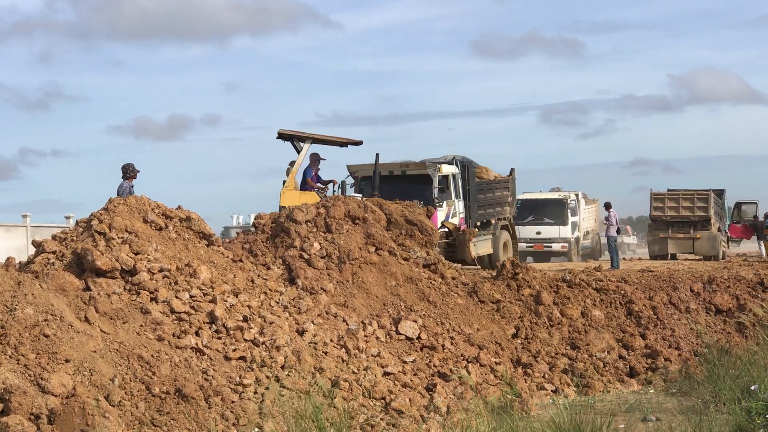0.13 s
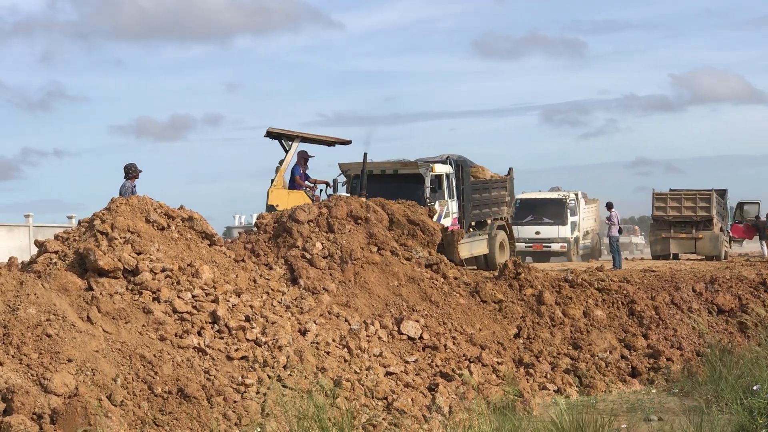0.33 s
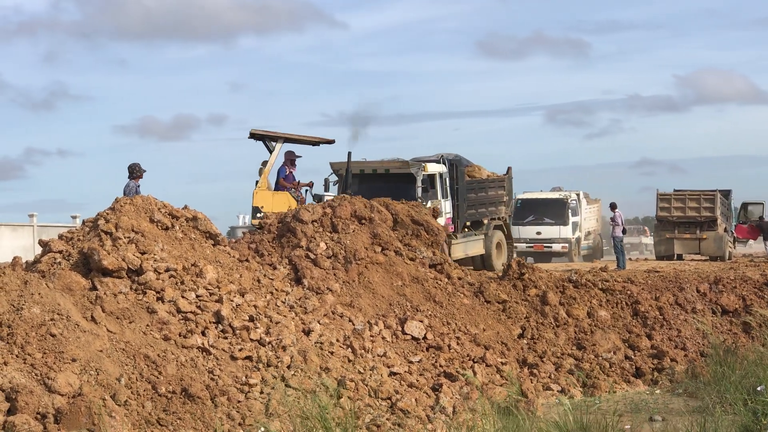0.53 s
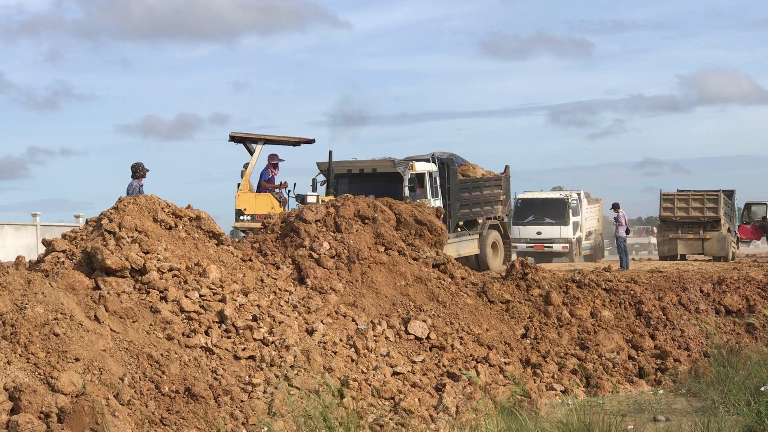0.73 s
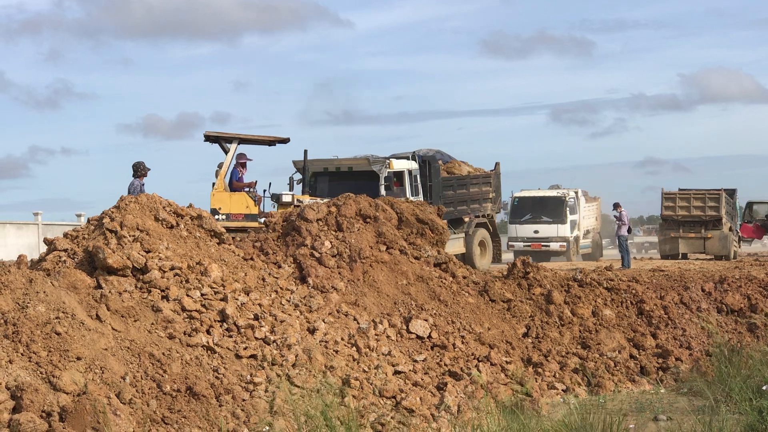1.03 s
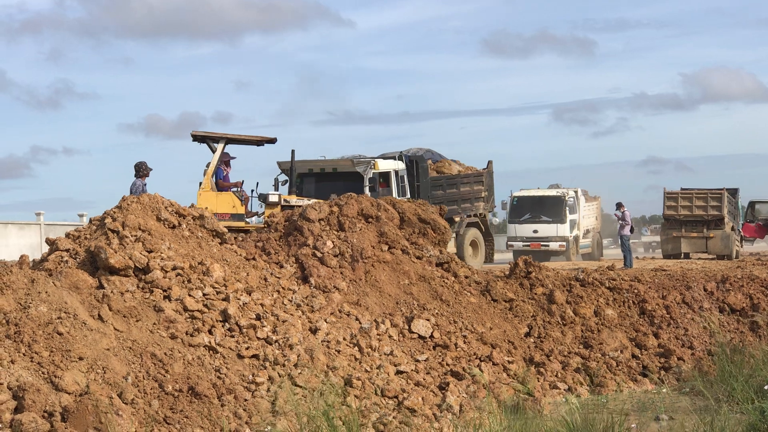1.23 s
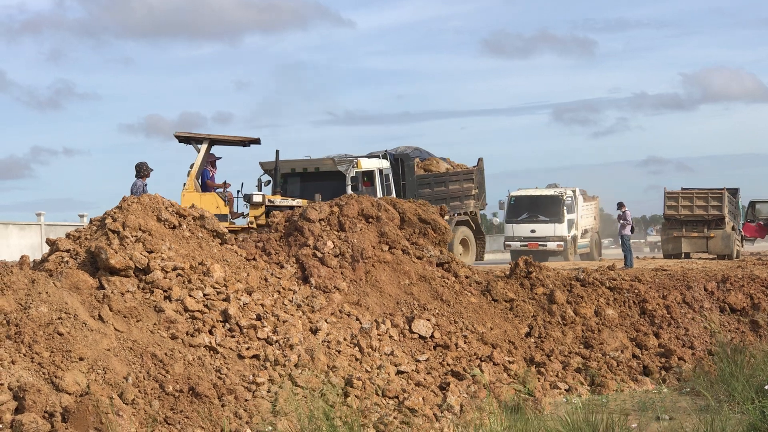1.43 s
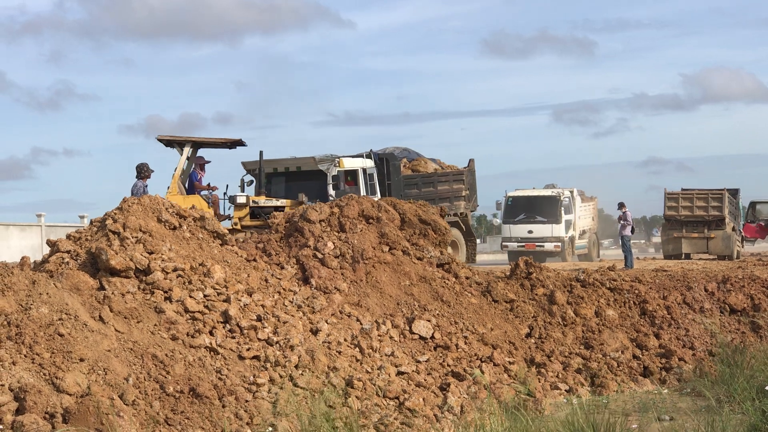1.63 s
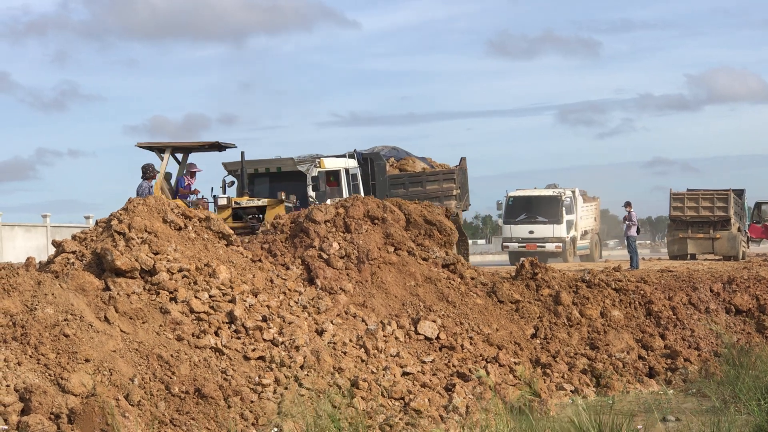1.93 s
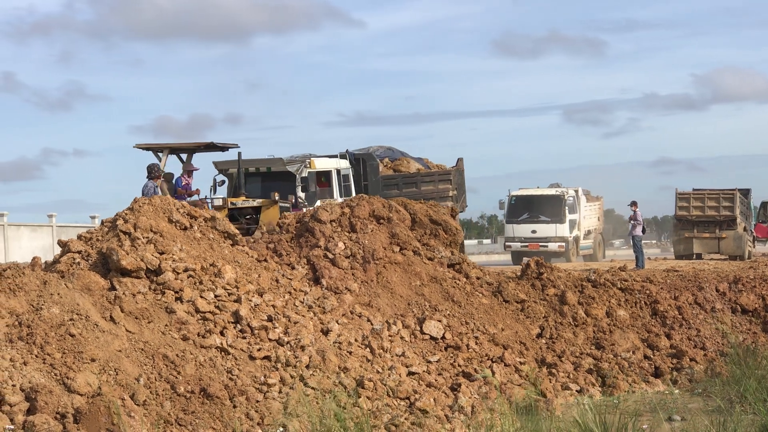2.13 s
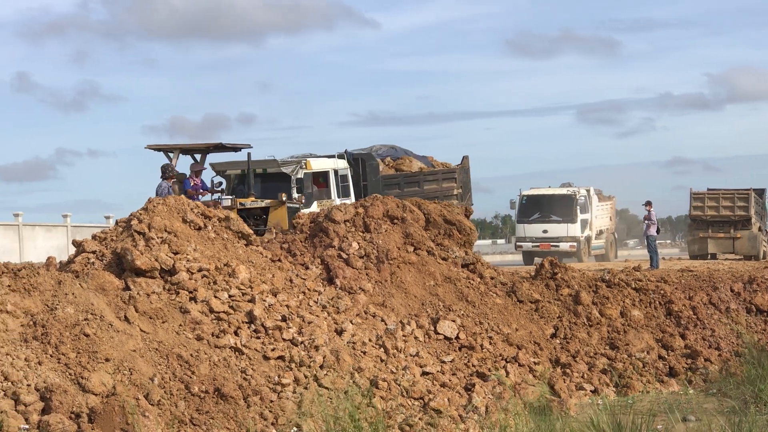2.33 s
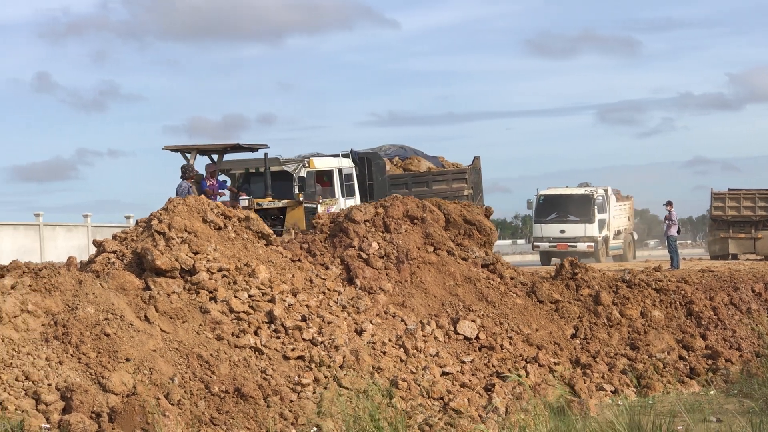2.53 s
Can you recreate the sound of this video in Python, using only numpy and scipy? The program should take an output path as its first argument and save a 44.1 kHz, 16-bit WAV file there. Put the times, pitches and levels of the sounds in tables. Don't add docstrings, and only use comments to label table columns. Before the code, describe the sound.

A bulldozer's low, uneven diesel drone runs throughout, with clattering hiss and steel tracks clanking, ringing and squeaking; a truck revs and fades early on, over outdoor site rumble, heard from afar in mono.

```python
import sys
import numpy as np
from scipy import signal
from scipy.io import wavfile
from scipy.ndimage import uniform_filter1d

SR = 44100
rng = np.random.default_rng(int(sys.argv[2]) if len(sys.argv) > 2 else 0)


def amplitude_ratio(level_db):
    exponent = np.asarray(level_db, float) / 20
    return 10 ** exponent


def inscribe(sig):
    pcm = np.round(np.clip(np.atleast_2d(sig).T, -1, 1) * 32767)
    wavfile.write(sys.argv[1], SR, pcm.astype(np.int16))


N = 118629
T = np.arange(N) / SR

# frequency [Hz], density [dB per Hz].
RUMBLE_SHAPE = [(22, -12), (33, -3), (45, 0), (85, 1), (110, 0), (160, -4), (210, -12), (300, -22)]
# centre in seconds, level in dB, pitch in Hz, length in seconds.
SHUDDERS = [
    (0.18, -48, 51, .45),
    (1.654, -38, 45, 0.25),
    (1.28, -44, 130, 0.12),
    (1.9, -41, 120, .14),
]
# time in seconds, pipe note in Hz, level in dB.
TRUCK_NOTE = [(0, 95, -33), (.25, 104, -35), (.43, 114, -42), (.58, 108, -47), (.74, 112, -40),
              (.95, 120, -45), (1.18, 117, -44), (1.45, 114, -49), (1.7, 112, -60)]
# multiple of the pipe note, level in dB relative to it.
TRUCK_ORDERS = [(.5, -7), (1, 0), (1.5, -12)]
# resonance in Hz, width in Hz, level in dB.
PANELS = [(387, 45, -63.5), (602, 120, -65), (973, 21, -63.5), (1266, 130, -62.5), (1422, 64, -60),
          (1638, 120, -72), (2064, 250, -62), (3000, 220, -66.5), (3394, 220, -68), (6240, 440, -73)]
# time in seconds, engine effort in dB, scraping of the tracks in dB.
EFFORT = [(0, 1, -0.5), (.3, 0.5, -2.5), (.65, 0.5, 2), (.8, 1, -1.5), (1.2, 1, 0), (1.55, 0.5, -1.5),
          (1.95, 0, 2), (2.3, 0, 1.5), (2.69, -0.5, 2.5)]
# time in seconds, peak in dB, mid band in dB, top band in dB.
CLANKS = [(0.105, -43, 9, -7), (0.393, -34.5, 9, -8), (0.4043, -42, -1, -15), (0.413, -53, 13, -16),
          (0.4894, -53, 2, -16), (0.5571, -40, 4.5, -0.5), (0.5995, -39.5, 6, -11), (0.7004, -38, 5, -12),
          (0.8525, -43, 8, 0), (0.9454, -37.5, -1, 0), (0.9922, -51, 22, 1), (1.038, -38, 3, -1),
          (1.08, -43, 3, -10), (1.1369, -40.5, 1, -5), (1.1764, -44, -2, -3), (1.2237, -39, 10, 5.5),
          (1.2631, -39.5, -8, -8), (1.3042, -44, -1, -15), (1.3326, -46.5, 0, 4.5), (1.344, -48, 6, -1),
          (1.4337, -47.5, -11, 2), (1.6924, -44, 9, -4), (1.7582, -45, 6, -23), (1.8545, -51, 8, -10),
          (1.9009, -44, 2, -14), (1.9494, -43, 7, -10), (2.0103, -51, 1, -18), (2.1198, -46, -2, -7),
          (2.5324, -37.5, 6, -3), (2.541, -51, -1, -5)]
# start in seconds, peak in dB, pitch in Hz, 60 dB decay in seconds.
RINGS = [(0.5606, -34.5, 2130, 0.055), (0.6045, -35, 2164, 0.16), (0.8492, -40, 2070, 0.23),
         (0.9434, -30.5, 2007, 0.048), (1.1744, -41, 2050, 0.11), (1.2745, -36, 2057, 0.049),
         (1.304, -38.5, 2610, 0.24), (1.5749, -36, 2586, 0.15), (1.6501, -41.5, 2600, 0.2),
         (1.7543, -37, 2600, 0.063), (0.411, -37, 1700, 0.055), (0.4943, -39, 2130, 0.083),
         (0.5267, -38, 1920, 0.08), (0.626, -39, 2102, 0.06), (0.684, -36, 1920, 0.1),
         (1.0331, -44, 2070, 0.03), (1.1433, -43, 2030, 0.091), (1.798, -40, 3010, 0.07),
         (1.8532, -35.5, 2992, 0.066), (1.875, -41, 3300, 0.12), (1.915, -39, 3020, 0.081),
         (1.978, -41, 3140, 0.11), (1.995, -39, 3280, 0.06), (2.0293, -39, 3070, 0.099),
         (2.0582, -39, 2970, 0.093), (2.079, -44, 3020, 0.074), (2.25, -44, 4103, 0.061),
         (2.31, -45, 3610, 0.067), (2.4268, -50, 2955, 0.07), (2.541, -44, 4150, 0.058)]
# centre in seconds, level in dB, pitch in Hz,
# length in seconds.
SQUEAKS = [(.404, -53, 6050, .014), (.405, -52, 7000, .014), (.564, -52, 7700, .016),
           (.467, -51, 3250, .02), (.6, -52, 3350, .02), (.64, -50, 3300, .022), (.672, -51, 3300, .02),
           (.949, -49, 11200, .012), (.952, -54, 14900, .014), (1.04, -53, 14700, .012),
           (1.04, -55, 10700, .01), (1.055, -58, 13200, .006), (1.085, -59, 11700, .016),
           (1.013, -58, 11500, .014), (1.022, -57, 14100, .016), (1.041, -48, 13200, .012),
           (1.043, -52, 7700, .012), (1.229, -50, 15100, .012), (1.45, -51, 1300, .03),
           (1.49, -51, 1230, .03), (1.525, -52, 1300, .025), (1.545, -54, 3500, .025),
           (1.690, -51, 830, .05), (1.698, -56, 11000, .012), (1.862, -59, 11700, .016),
           (1.961, -64, 11700, .014), (2.388, -59, 11900, .028), (2.545, -47, 480, .045)]
# time in seconds, firing rate in Hz, exhaust note in dB, second harmonic in dB.
DOZER_NOTE = [(0, 64.4, -31, -31.5), (.2, 63.47, -33, -40), (.32, 62.02, -35, -41.5),
              (.4, 61.66, -21.5, -40.5), (.55, 61.9, -27, -45.5), (.68, 62.64, -26, -38),
              (.88, 66, -32, -43), (1.05, 67.75, -35.5, -34), (1.18, 63.7, -37.5, -44.5),
              (1.3, 61.7, -32, -38.5), (1.45, 63.32, -32, -38), (1.63, 65.35, -29, -35),
              (1.8, 63.1, -33.5, -33), (1.9, 61.27, -32.5, -43.5), (2.1, 66.8, -30.5, -33.5),
              (2.2, 68.67, -37, -34.5), (2.5, 67.9, -32, -40), (2.69, 68.1, -37, -37)]
# multiple of the firing rate, level in dB.
UNEVEN_ORDERS = [(1.25, -50), (1.5, -50), (2.25, -60), (2.5, -53), (4, -64)]
# centre in seconds, change of exhaust note in dB,
# change of second harmonic in dB, length in seconds.
JOLTS = [(0.071, -5, -8, 0.039), (0.112, 4.5, -10, 0.057), (.16, -10, -4, 0.037), (.21, 3.5, 7, 0.055),
         (0.266, 6, 7, 0.031), (0.356, 0, -15, 0.035), (.43, -4.5, 8, 0.049), (.5, -0.5, -3, 0.053),
         (0.549, -6, 11, 0.024), (0.795, -2.5, -5, 0.04), (0.866, -4, -7, .04), (0.926, 3.5, 3, 0.061),
         (0.993, -4, 0, 0.044), (1.113, 7.5, 1, .06), (1.166, -12, 4, 0.048), (1.255, 5.5, 5.5, 0.047),
         (1.3, -6, 8, 0.042), (1.329, 8, -7, 0.041), (1.404, 3.5, -1, 0.057), (1.455, 6, -1, .04),
         (1.537, 0.5, 0.5, 0.056), (1.629, -1, 5, 0.039), (1.686, 0, -5, 0.034), (1.93, 0.5, 1, 0.047),
         (2.09, 2, -1.5, 0.057), (2.169, 1.5, -9, 0.053), (2.555, 0, -2, 0.068)]
# time in seconds, third harmonic in dB.
BARK = [(0, -49), (.3, -54), (.47, -42.5), (.7, -58), (.9, -54.5), (1.2, -51.5), (1.42, -44.5), (1.65, -52),
        (1.85, -69), (2.12, -59), (2.3, -59), (2.69, -64)]
# frequency [Hz], density [dB per Hz].
CLATTER_SHAPE = [(130, -6), (220, -29), (277, -2), (382, 1.5), (2110, -5), (3420, -9.5), (4800, -14.5),
                 (6160, -18.5), (15600, -28.5)]

RUMBLE_DB, RUMBLE_SWELL_DB = -44, 1.5
IDLE_HZ, IDLE_DB, IDLE_FLICKER_DB = 49.5, -45, 2.5
PITCH_JITTER = .003
BAND_FLICKER_DB = 0.87
SCRAPE_FROM_HZ, SCRAPE_FULL_HZ = 1800, 4500
BUZZ_DB, BUZZ_PER_S = 2.5, 45
RASP_GAIN = 2.1
ATTACK_S, HOLD_S, CLANK_T60_S, EARLY_S = .005, .002, .08, 0.0046
TAIL_DB, TAIL_T60_S = -11, 0.3
MODE_DB, MODE_SCATTER_DB, GRAIN_DB = -23.5, 2.5, 2.5
RING_DB, RING_ROUGH_DB, SQUEAK_ROUGH_DB = -8, 3.2, 3.5
WOBBLE = .006
UNEVEN_FLICKER_DB, BARK_WIDTH_HZ = 4, 45
CLATTER_DB, CLATTER_SWELL_DB = -45.5, .2
GATE_DEPTH, GATE_SHARE = .3, 0.27
RATTLE_DB, RATTLE_SWING_DB, RATTLE_PER_S = -6.5, 3, 40
NOTCH_HZ, NOTCH_WIDTH_HZ, NOTCH_DEPTH = 10380, 730, 0.36
TOP_HZ, BOTTOM_HZ = 15700, 24


def level(x, db):
    return x * amplitude_ratio(db) / np.sqrt(np.mean(x ** 2))


def curve(table, k):
    points = np.array(table)
    return np.interp(T, points[:, 0], points[:, k])


def band(x, lo_hz, hi_hz):
    edges = [lo_hz, min(hi_hz, .45 * SR)]
    return signal.sosfilt(signal.butter(2, edges, "bandpass", fs=SR, output="sos"), x)


def noise():
    return rng.standard_normal(N)


def walk(rate):
    k = int(SR / rate)
    held = np.repeat(rng.standard_normal(N // 100), k)[:N + k]
    return 1.3 * uniform_filter1d(uniform_filter1d(held, k), k)[:N]


def bump(s, length):
    return np.exp(-((T - s) / length * 2) ** 2)


def blow(start, attack_s, hold_s, t60):
    u = np.maximum(T - start, 0)
    fall = amplitude_ratio(-60 * np.maximum(u - attack_s - hold_s, 0) / t60)
    return np.minimum(u / attack_s, 1) * fall


def coloured(shape, source, swell, treble=0):
    hz, db = np.array(shape).T
    edges = np.geomspace(hz[0], hz[-1], num=int(3 * np.log2(hz[-1] / hz[0])) + 1)
    treble_share = np.interp(edges, [SCRAPE_FROM_HZ, SCRAPE_FULL_HZ], [0, 1])
    out = np.zeros(N)
    for lo, hi, share in zip(edges[:-1], edges[1:], treble_share):
        band_db = np.interp(np.log(lo * hi) / 2, np.log(hz), db)
        moving_db = (2.5 - share) * swell + share * treble + BAND_FLICKER_DB * walk(8.923)
        out += amplitude_ratio(band_db + moving_db) * band(source(), lo, hi)
    return out


def turns(hz):
    return np.cumsum(hz * (1 + PITCH_JITTER * walk(13.05))) / SR


def order(phase, k, db, flicker_db):
    gain = np.sqrt(2) * amplitude_ratio(db + flicker_db * walk(8.604))
    return gain * np.sin(2 * np.pi * (k * phase + rng.random()))


def site_rumble():
    return level(coloured(RUMBLE_SHAPE, noise, RUMBLE_SWELL_DB * walk(2.15)), RUMBLE_DB)


def parked_truck():
    return order(turns(np.full(N, IDLE_HZ)), 1, IDLE_DB, IDLE_FLICKER_DB)


def ground_shudders():
    return sum(amplitude_ratio(db) * bump(s, length) * np.sin(2 * np.pi * hz * T) for s, db, hz, length in SHUDDERS)


def leaving_truck():
    phase = turns(curve(TRUCK_NOTE, 1))
    return sum(order(phase, k, curve(TRUCK_NOTE, 2) + db, 1) for k, db in TRUCK_ORDERS)


def panels():
    out = np.zeros(N)
    for hz, width, db in PANELS:
        buzz_db = BUZZ_DB * walk(BUZZ_PER_S)
        if hz > SCRAPE_FULL_HZ / 2:
            buzz_db = buzz_db + RASP_GAIN * curve(EFFORT, 2)
        out += amplitude_ratio(buzz_db) * level(band(noise(), hz - width / 2, hz + width / 2), db)
    return out


def track_clanks():
    edges = np.geomspace(350, TOP_HZ, num=45)
    modes = np.array([level(band(noise(), lo, hi), MODE_DB) for lo, hi in zip(edges[:-1], edges[1:])])
    scatter = MODE_SCATTER_DB * rng.standard_normal((40, len(modes)))
    grain = amplitude_ratio(GRAIN_DB * walk(210))
    colour_hz = np.log([500, 1800, 6000, 9500, 11500])
    out = np.zeros(N)
    for (s, db, mid_db, top_db), own_db in zip(CLANKS, scatter):
        tilt_db = np.interp(np.log(edges[1:]), colour_hz, [mid_db - 10, mid_db - 4, 0, -3, top_db])
        span = slice(int((s - .02) * SR), int((s + .2) * SR))
        slap = blow(s - EARLY_S, ATTACK_S, HOLD_S, CLANK_T60_S)
        tail = amplitude_ratio(TAIL_DB) * blow(s, ATTACK_S, 0, TAIL_T60_S)
        steel = amplitude_ratio(db + tilt_db + own_db) @ modes[:, span]
        out[span] += ((slap + tail) * grain)[span] * steel
    return out


def plates_and_pins():
    shake = amplitude_ratio(RING_ROUGH_DB * walk(260))
    slip = T + np.cumsum(WOBBLE * walk(220)) / SR
    rough = amplitude_ratio(SQUEAK_ROUGH_DB * walk(300))
    out = np.zeros(N)
    for s, db, hz, t60 in RINGS:
        out += amplitude_ratio(db + RING_DB) * shake * blow(s, ATTACK_S, 0, t60) * np.sin(2 * np.pi * hz * slip)
    for s, db, hz, length in SQUEAKS:
        out += amplitude_ratio(db) * rough * bump(s, length) * np.sin(2 * np.pi * hz * slip)
    return out


def dozer_exhaust(phase):
    jolt = sum(np.outer([db, second_db], bump(s, length)) for s, db, second_db, length in JOLTS)
    note = order(phase, 1, curve(DOZER_NOTE, 2) + jolt[0], 0.47)
    note = note + order(phase, 2, curve(DOZER_NOTE, 3) + jolt[1], 0.95)
    ragged = level(band(noise(), 1.6, BARK_WIDTH_HZ / 2), 0)
    note = note + ragged * order(phase, 3, curve(BARK, 1), 1)
    return note + sum(order(phase, k, db, UNEVEN_FLICKER_DB) for k, db in UNEVEN_ORDERS)


def diesel_clatter(phase):
    gate = 1 + GATE_DEPTH * np.exp(-(phase % 1) / GATE_SHARE)
    rattle = amplitude_ratio(RATTLE_DB + RATTLE_SWING_DB * walk(RATTLE_PER_S))
    swell = curve(EFFORT, 1) + CLATTER_SWELL_DB * walk(3.9)
    hiss = coloured(CLATTER_SHAPE, lambda: (gate + rattle) * noise(), swell, curve(EFFORT, 2))
    return level(hiss, CLATTER_DB)


def dozer():
    phase = turns(curve(DOZER_NOTE, 1))
    return dozer_exhaust(phase) + diesel_clatter(phase)


def scene():
    engines = dozer() + leaving_truck() + parked_truck()
    ground = ground_shudders() + site_rumble()
    metal = panels() + track_clanks() + plates_and_pins()
    return (engines + ground + metal)[None]


def low_pass(x):
    return signal.sosfilt(signal.butter(12, 15700, fs=SR, output="sos"), x)


def record(dry):
    peak = signal.iirpeak(NOTCH_HZ, NOTCH_HZ / NOTCH_WIDTH_HZ, fs=SR)
    dipped = dry - NOTCH_DEPTH * signal.lfilter(*peak, dry)
    bass_cut = signal.butter(2, BOTTOM_HZ, "highpass", fs=SR, output="sos")
    return low_pass(signal.sosfilt(bass_cut, dipped))


dry = scene()
out = record(dry)
inscribe(out)
```